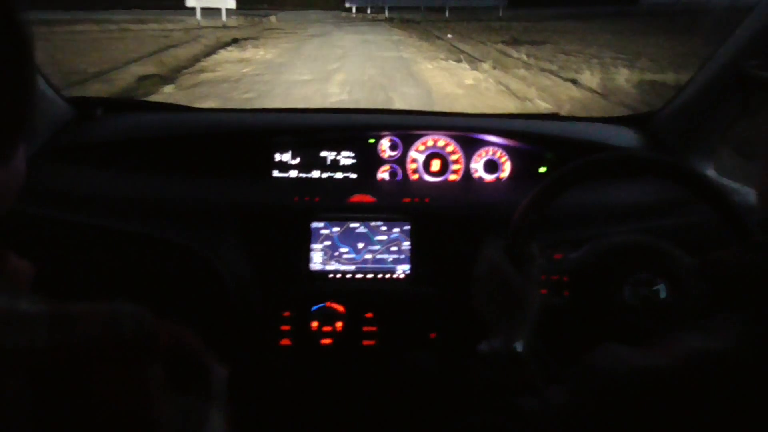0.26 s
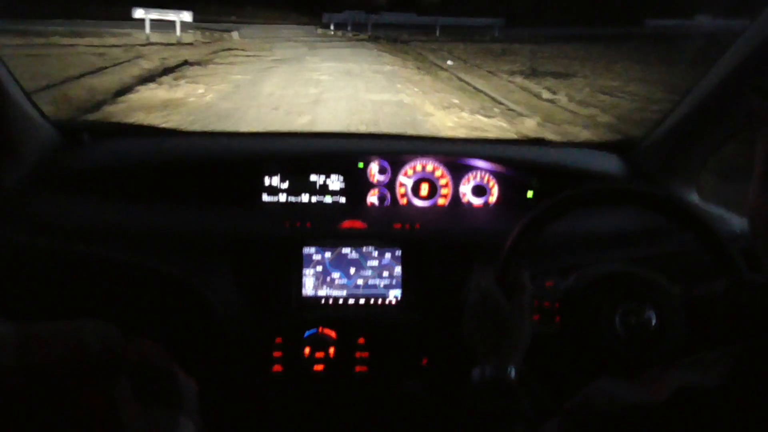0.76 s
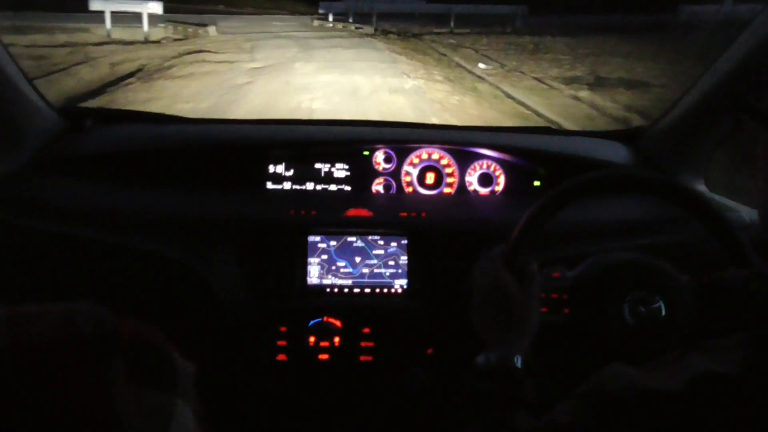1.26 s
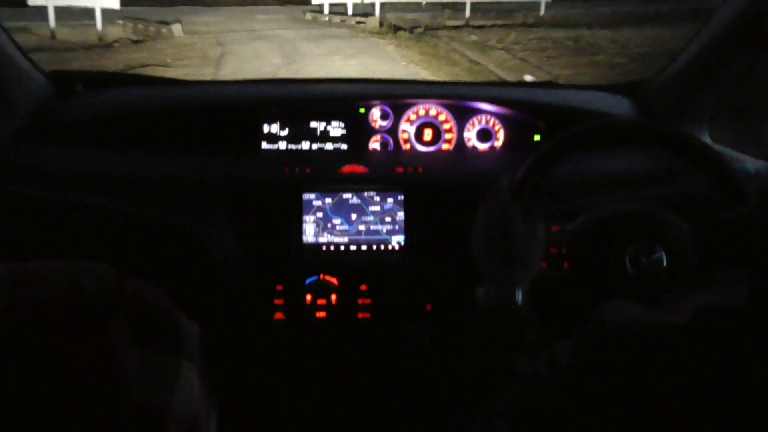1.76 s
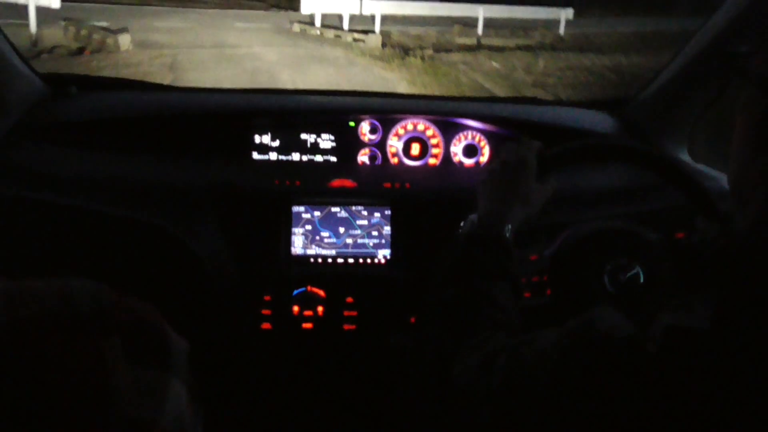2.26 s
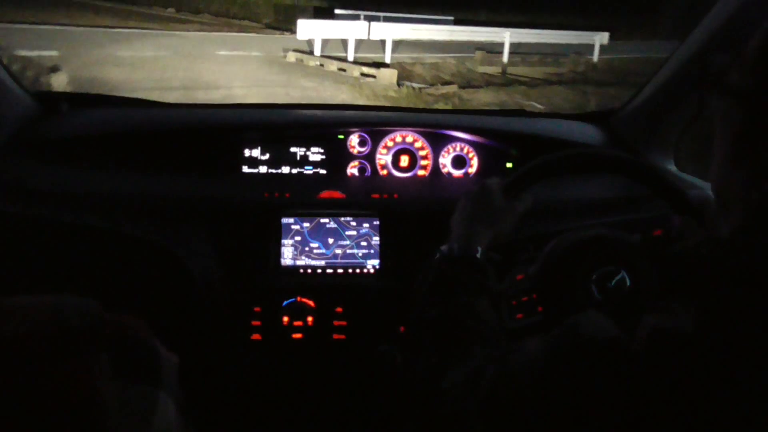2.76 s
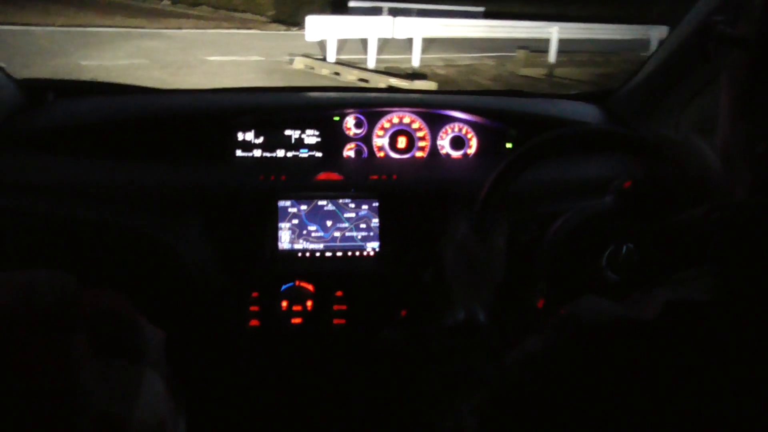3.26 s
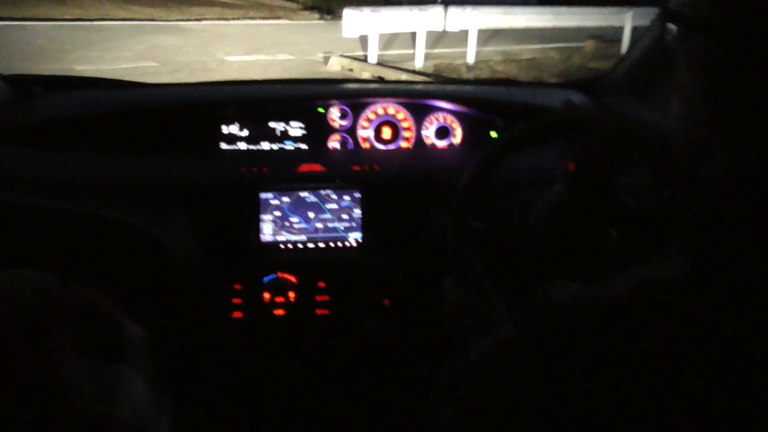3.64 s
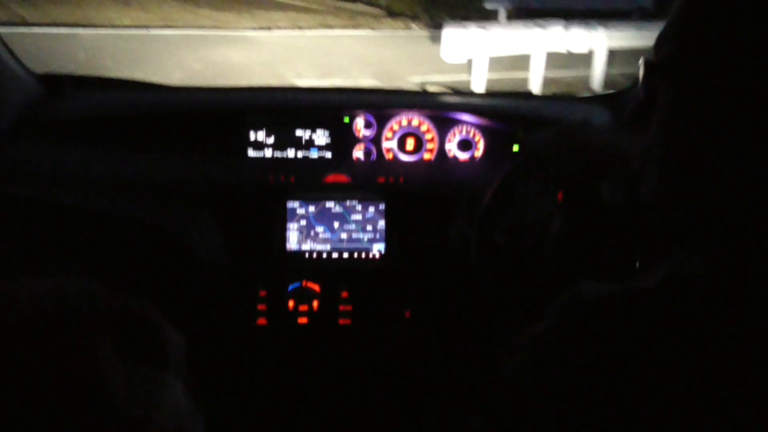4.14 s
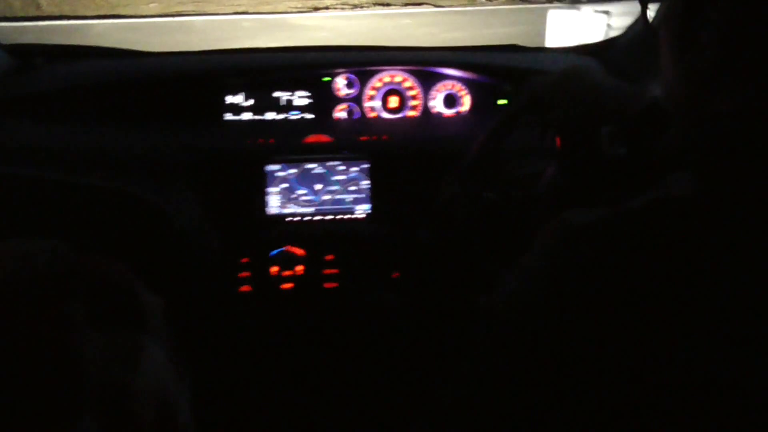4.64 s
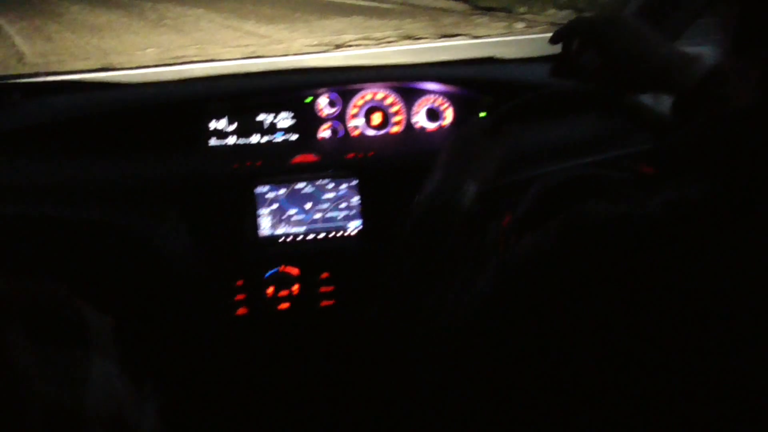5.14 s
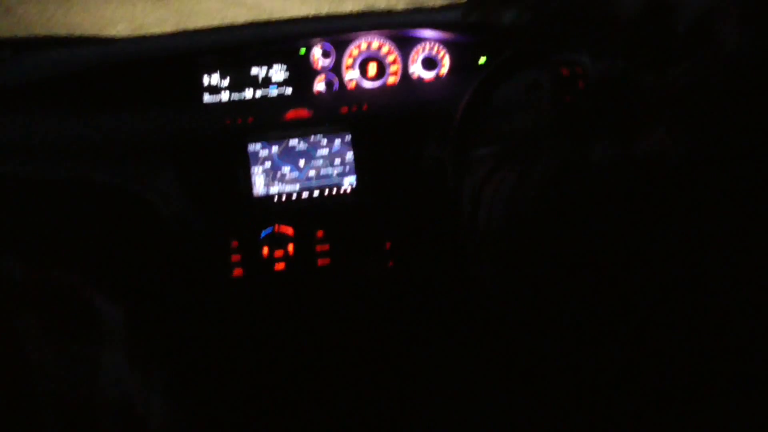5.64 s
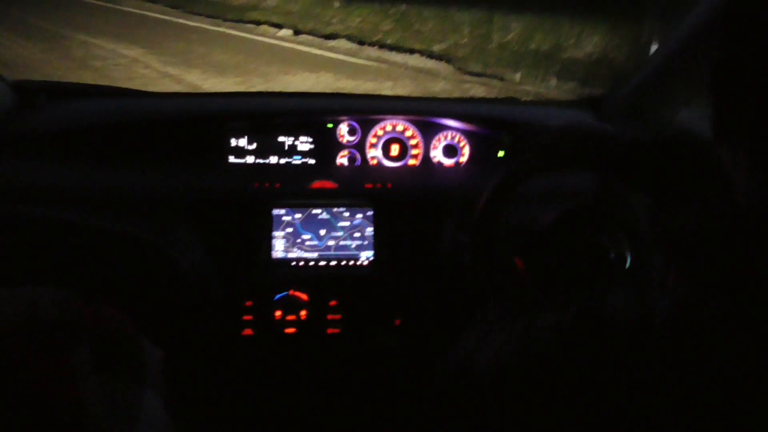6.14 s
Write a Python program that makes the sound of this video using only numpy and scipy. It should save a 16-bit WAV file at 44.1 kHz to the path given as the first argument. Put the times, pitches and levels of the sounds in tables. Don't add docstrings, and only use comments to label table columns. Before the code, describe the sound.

A close, muffled cabin microphone picks up boomy low road noise, fluttering with every ridge, while small stones tick underneath and plastic panels chatter. The car slows and the roar thins out to a low wash. Dry rustling of palms on the wheel comes forward, with sharp trim ticks and suspension clunks. The heaviest blow comes late, a dull double thump, then light knocks to the end.

```python
import sys
import numpy as np
from scipy import signal
from scipy.fft import rfft, irfft, next_fast_len
from scipy.io import wavfile
from scipy.ndimage import uniform_filter1d, map_coordinates

SR = 44100
rng = np.random.default_rng(int(sys.argv[2]) if len(sys.argv) > 2 else 0)


def pcm_store(signal):
    levels = np.round(np.clip(np.atleast_2d(signal), -1, 1) * 32767)
    wavfile.write(sys.argv[1], SR, levels.astype(np.int16).T)


def convert_level_to_amplitude(level_db):
    exponent = np.asarray(level_db, float) / 20
    return 10 ** exponent


N = 282240


def unit(x):
    return x / np.sqrt(np.mean(x ** 2) + 1e-20)


def along(points, hz):
    f, v = np.transpose(points)
    return np.interp(np.log(hz + 1), np.log(f + 1), v)


def curves(rows):
    s, *cols = np.transpose(rows)
    return [np.interp(np.arange(N) / SR, s, c) for c in cols]


def swings(rows, half_s):
    s, db = np.transpose(rows)
    t = np.arange(0, N + 64, 64) / SR
    lift = db * np.exp(-((t[:, None] - s) / half_s) ** 2)
    return np.interp(np.arange(N) / SR, t, lift.max(axis=1) + lift.min(axis=1))


def wobble(rate):
    knots = rng.standard_normal(int(N * rate / SR) + 4)
    return map_coordinates(knots, [np.arange(N) * rate / SR])


def filtered(x, response):
    m = next_fast_len(N + SR // 2)
    return irfft(rfft(x, m) * response(np.fft.rfftfreq(m, 1 / SR)), m)[..., :N]


def resonant(modes):
    def response(f):
        total = 0
        for k, (centre, width, db) in enumerate(modes):
            damping = 1j * f * width
            total = total + (-1) ** k * convert_level_to_amplitude(db) * damping / (centre * centre - f * f + damping)
        return total
    return response


def shaped(points):
    return lambda f: convert_level_to_amplitude(along(points, f))


def below(hz):
    return lambda f: 1 / (1 + 1j * f / hz) ** 4


def rush(response, lumps_db=0, even=0):
    x = unit(filtered(convert_level_to_amplitude(lumps_db) * rng.standard_normal((2, N)), response))
    power = uniform_filter1d(uniform_filter1d(x ** 2, SR // 12), SR // 12)
    return unit(x / np.abs(power + 1e-3) ** (even / 2))


def bursts(times, gains, t60, rise):
    t = np.arange(SR // 10) / SR
    shape = convert_level_to_amplitude(-60 * t / t60) * (1 - np.exp(-t / rise))
    out = np.zeros((2, N + len(t)))
    for s, g, noise in zip(times, gains, rng.standard_normal((len(times), 2, len(t)))):
        start = round(s * SR)
        burst = shape * noise
        out[:, start:start + len(t)] += g * burst / np.linalg.norm(burst, axis=1, keepdims=True)
    return out[:, :N]


def pushes(times, gains, length):
    out = np.zeros((2, N))
    out[0, np.round(times * SR).astype(int)] = gains
    push = np.sin(np.pi * np.arange(0, 1, 1 / (length * SR)))
    return signal.fftconvolve(out, push[None], axes=1)[:, :N]


# f/Hz, correlation/1
LIKENESS = [(30, 1), (80, 0.98), (170, 0.91), (350, 0.92), (700, 0.74), (1400, 0.52), (3000, 0.47),
            (5000, 0.4), (9000, 0.23), (14000, 0.26)]


def stereo(pair):
    def turn(hz):
        angle = np.arccos(np.clip(along(LIKENESS, hz), -1, 1)) / 2
        return np.array([np.cos(angle), np.sin(angle)])
    mid, side = filtered(pair, turn)
    return np.array([mid + side, mid - side])


def sides(times, lean_db):
    return convert_level_to_amplitude(np.interp(np.arange(N) / SR, times + .005, lean_db) / 2 * [[1], [-1]])


# f/Hz, level/dB per Hz
HISS = [(1060, -36.5), (1800, -0.5), (2010, -11), (5810, -11.5), (7340, -11), (11300, -4.5), (15500, -8)]


def microphone_hiss():
    return convert_level_to_amplitude(-70.5) * stereo(rush(shaped(HISS)))


# f/Hz, level/dB per Hz
DRONE = [(200, -26.5), (400, 1.5), (700, -7.5), (1200, -13.5), (1550, -16.5), (1900, -32), (3000, -51.5)]


def engine_bay():
    return convert_level_to_amplitude(-56.0 + wobble(4.5)) * rush(shaped(DRONE))


# t/s, rolling energy level/dB
SPEED = [
    (0, -0.5),
    (2.0, 0.5),
    (3.4, -6.5),
    (5.0, -9.5),
    (6.4, -17),
]
# f/Hz, width/Hz, level/dB
SHELL = [(25.6, 20, -25.5), (38.3, 10, -12), (79.94, 6.9, 2.5)]
# f/Hz, level/dB
SHAKE_DIP = [(25, 0), (40, -1.5), (52, -5), (66, 0)]
# t/s, lift level/dB
HEAVES = [(.21, 2.5), (.66, 6.5), (.89, 1.5), (1.05, 3), (1.4, 2.5), (1.55, 1.5), (1.7, 6.5), (1.9, 4),
          (2.04, 0), (2.33, 8), (2.5, 7), (2.91, 5.5), (3.47, 2), (3.66, 7), (3.92, 7.5), (4.08, 7),
          (4.51, 6), (4.87, 2.5), (5.6, 6), (6.0, 7), (6.22, 9.5)]


def shell_shake(speed_db):
    shake = rush(lambda f: resonant(SHELL)(f) * below(200)(f) * shaped(SHAKE_DIP)(f) * f / (f + 15), even=0.91)
    return convert_level_to_amplitude(-28.5 + 1.04 * speed_db + swings(HEAVES, half_s=0.062)) * shake


# f/Hz, width/Hz, level/dB
CABIN = [(107.2, 10.5, -1.5), (132.2, 11.94, 2.5), (149.9, 22.2, -5.5)]
# t/s, lift level/dB
PUMPS = [(.1, 3), (.32, 4.5), (.48, 8.5), (.66, 8.5), (.75, 4.5), (.89, 2), (1.05, 9.5), (1.25, 2.5),
         (1.34, 6.5), (1.6, 3.5), (1.83, 6.5), (1.99, 5), (2.3, 6), (2.46, 7.5), (2.71, 6.5), (2.95, -2),
         (3.33, 7.5), (3.65, -1), (3.99, 3.5), (4.15, -1), (4.31, 3.5), (4.42, 3), (4.63, 7), (5.17, 8),
         (5.33, 9.5), (5.6, 6.5), (5.72, 7), (5.78, 9), (6.15, 10.5), (6.39, 3)]


def cabin_boom(speed_db):
    boom = rush(lambda f: resonant(CABIN)(f) * below(500)(f) * f / 130, even=0.52)
    return convert_level_to_amplitude(-27.5 + 0.96 * speed_db + swings(PUMPS, half_s=0.044)) * boom


# f/Hz, width/Hz, level/dB
TYRE = [(201, 19.7, -1.5), (226.9, 11.1, 0.5)]
# t/s, lift level/dB
RIDGES = [(.06, 6), (.36, 4), (.68, 9.5), (.93, 11.5), (1.5, 6), (2.91, 8.5), (3.62, 6.5), (4.42, 10),
          (4.81, 8.5), (5.03, 5.5), (5.74, 13.5), (.15, 7), (.22, -3.5), (.5, 1.5), (.59, 7.5), (.8, 0.5),
          (1.05, 4), (1.2, 3.5), (1.36, -4), (1.62, 0.5), (1.75, 2.5), (1.9, 3.5), (2.05, 3.5), (2.2, -2),
          (2.35, 3.5), (2.5, 0.5), (2.7, 1), (3.1, 9), (3.3, 4.5), (3.45, 4.5), (3.85, 0), (4.1, 1.5),
          (5.25, -12), (5.45, -21), (6.05, 4)]


def tyre_hum(speed_db, stones):
    hum = rush(lambda f: resonant(TYRE)(f) ** 2, lumps_db=1.5 * stones, even=0.78)
    return convert_level_to_amplitude(-34.5 + 1.14 * speed_db + swings(RIDGES, half_s=0.069)) * hum


# f/Hz, level/dB per Hz
ROAR = [(100, -20.5), (170, 8.5), (219, 1), (253, -3.5), (295, -6.5), (370, -14.5), (439, -14.5),
        (505, -22), (590, -19), (652, -23), (1130, -34.5), (1760, -51.5), (2050, -51.5), (5000, -65.5),
        (6500, -94.5), (11000, -120)]
# t/s, lift level/dB
PATCHES = [(.2, 2.5), (.5, -2.5), (.71, 5), (.89, -1), (1.34, 0.5), (1.99, 1.5), (2.5, 1.5), (2.97, -2.5),
           (3.2, 3), (3.33, -2), (3.55, -6), (4.23, 6.5), (4.85, -4), (5.33, 5), (5.4, -1), (6.24, -1)]


def tread_roar(rough_db, stones):
    def floor(f):
        high_pass = (f / 240) ** 4 / (1 + (f / 240) ** 4)
        lift = convert_level_to_amplitude(5 / (1 + (f / 1580) ** 16))
        return shaped(ROAR)(f) * high_pass * lift
    roar = rush(floor, lumps_db=1.3 * stones + 1.1 * wobble(45))
    return convert_level_to_amplitude(rough_db + 4 + swings(PATCHES, half_s=0.04)) * roar


# t/s, level/dB
ROAD = [(0.0, -31.5), (0.46, -34.5), (0.8, -32.5), (1.23, -34), (1.57, -32), (1.8, -33.5), (2.41, -40),
        (2.73, -37.5), (2.97, -41.5), (3.24, -45), (3.6, -44.5), (4.15, -49), (4.45, -41.5), (4.62, -42.5),
        (5.24, -48.5), (5.72, -45), (6.01, -48), (6.4, -50)]


def road():
    rough_db, speed_db = curves(ROAD)[0], curves(SPEED)[0]
    lift_db = 0.22 * (rough_db - rough_db.mean())
    stones = wobble(14)
    low = shell_shake(speed_db) + cabin_boom(speed_db) + tyre_hum(speed_db, stones)
    return convert_level_to_amplitude(lift_db) * low + tread_roar(rough_db, stones)


# t/s, lift level/dB
DRUMS = [(.06, -1), (.3, 5), (.45, 10.5), (.62, 12.5), (.95, 2), (1.06, 15.5), (1.55, 15), (1.7, 8),
         (1.87, 9), (2.1, 7), (2.22, 6.5), (2.4, 12), (2.52, 10.5), (2.7, 5), (2.9, 12), (3.25, 11),
         (3.6, 12.5), (3.9, 8.5), (4.15, 4), (4.45, 3), (4.8, 12), (5.1, 10), (5.27, 16), (5.55, 11),
         (5.69, 6), (5.88, 6), (6.22, 8), (6.34, 5)]


def floor_pan():
    hum = rush(lambda f: resonant([(296.2, 50, 0)])(f) ** 2, even=0.8)
    return convert_level_to_amplitude(-44.5 + 1.2 * curves(SPEED)[0] + swings(DRUMS, half_s=0.031)) * hum


# f/Hz, width/Hz, level/dB
TRIM = [(2085, 400, 3), (3090, 1100, 3.5), (4060, 3100, 1), (5230, 2200, -14)]


def grit(count=260):
    when, size = rng.random((count, 2)).T
    s = when * (N / SR - .01)
    db = curves(ROAD)[0][(s * SR).astype(int)] - 4.2 * np.log(size + 1e-3) - 13
    hits = bursts(s, convert_level_to_amplitude(db), t60=.025, rise=.0007)
    return filtered(hits, lambda f: resonant(TRIM)(f) * below(9000)(f))


# f/Hz, level/dB per Hz
RUSTLE = [(2940, -41.5), (5000, -22), (6300, -6), (7340, -0.5), (10300, -4), (12000, -2.5), (13200, -7),
          (15500, -22)]
# f/Hz, level/dB per Hz
SCUFF = [(1500, -14.5), (2100, -2), (2600, -6.5), (3900, -5), (5500, -9.5), (7000, -26.5)]
# start t/s, length t/s, level/dB, rise t/s
STROKES = [(0, 0.041, -67.5, .05), (0.148, 0.36, -73, 0.052), (0.624, 0.14, -66.5, .04),
           (1.03, .35, -69.5, 0.044), (1.48, 0.049, -67.5, .03), (1.602, 0.37, -71, .05),
           (1.955, 0.32, -69.5, 0.057), (3.215, .38, -65, 0.21), (3.95, 0.45, -64.5, 0.11),
           (4.718, 0.11, -55, 0.073), (3.11, .1, -72.5, 0.09), (4.913, 0.12, -62.5, 0.046),
           (5.135, 0.079, -67.5, .05), (5.27, 0.61, -64.5, .08), (4.505, 0.21, -71.5, .05),
           (4.797, 0.063, -59.5, .04), (5.85, .05, -64, 0.03), (6.003, 0.3, -63.5, .05),
           (6.116, 0.023, -61, .02), (6.288, 0.072, -63, 0.086), (6.394, .1, -54.5, 0.071),
           (3.238, .06, -71, .03), (3.64, .22, -67.5, .05), (3.97, .16, -66, .06)]


def slide():
    t = np.arange(N) / SR
    rest_db, let_go_s, slackens_db_per_s = -72, 0.099, 1
    power = 0
    for s, length, db, rise in STROKES:
        grip = np.clip((t - s) / rise + 1, 0, 1)
        release = np.exp(-np.maximum(t - s - length, 0) / let_go_s)
        power = power + convert_level_to_amplitude(2 * (db - slackens_db_per_s * (t - s))) * (grip * release) ** 2
    over_db = 10 * np.log10(1 + power / convert_level_to_amplitude(2 * rest_db))
    grain = rush(shaped(RUSTLE))
    fine = convert_level_to_amplitude(over_db) * grain
    weight = filtered(grain, lambda f: resonant([(7900, 2500, 0)])(f) ** 2)
    heavy = convert_level_to_amplitude(-22.5 + 1.5 * over_db) * weight
    coarse = convert_level_to_amplitude(-4.5 + 0.64 * over_db) * rush(shaped(SCUFF))
    return convert_level_to_amplitude(rest_db + 1.5 + 0.66 * wobble(35)) * (fine + heavy + coarse)


# t/s, f/Hz, level/dB
PINGS = [(.005, 1170, -37), (1.078, 3220, -59), (4.686, 1800, -62), (4.944, 1000, -52), (5.859, 1590, -57),
         (5.246, 416, -43), (4.496, 1680, -53), (.146, 900, -53), (.874, 805, -50), (.911, 776, -41),
         (1.169, 2050, -58), (2.461, 800, -56.5), (6.134, 2000, -64), (6.146, 2200, -57), (1.56, 810, -34),
         (4.63, 1190, -46), (4.783, 2130, -60), (5.535, 2700, -64), (1.483, 2200, -59), (1.518, 935, -40),
         (1.521, 2120, -52), (1.533, 2510, -55), (1.566, 2090, -54), (1.567, 4140, -58), (1.604, 940, -50),
         (1.638, 1050, -48), (1.638, 2080, -49), (1.643, 4580, -49), (2.235, 4530, -58), (2.474, 3580, -65),
         (4.607, 1480, -59), (4.63, 2170, -62), (4.715, 800, -48), (4.76, 2080, -60), (4.762, 1090, -55),
         (4.855, 2200, -62), (5.014, 1990, -64), (5.246, 1190, -46), (5.513, 940, -55), (5.513, 2200, -58),
         (5.524, 440, -42), (5.646, 770, -31.5), (5.647, 1080, -45), (5.647, 1364, -43), (5.646, 2210, -54),
         (5.65, 565, -42), (4.763, 530, -42), (4.762, 750, -39.5), (4.795, 744, -48), (4.803, 1150, -55),
         (4.63, 866, -50), (4.638, 605, -47), (4.948, 910, -53), (4.963, 1150, -51), (4.975, 700, -53),
         (1.573, 1100, -44), (1.574, 3500, -60), (5.512, 1235, -46), (5.52, 600, -42)]


def pings():
    out, t = np.zeros((2, N + SR)), np.arange(SR // 6) / SR
    t60_s = 0.032
    for s, hz, db in PINGS:
        decay_db = 60 * t / t60_s * (hz / 1000) ** 0.59
        tone = (1 - np.exp(-t / 0.0018)) * np.sin(2 * np.pi * hz * t)
        out[0, round(s * SR):][:len(t)] += convert_level_to_amplitude(db + 10.0 - decay_db) * tone
    return out[:, :N]


# t/s, peak level/dB, left-right level/dB
SNAPS = [(0.3691, -48.5, 0.5), (0.6274, -56, -5), (0.8, -54.5, 0.5), (1.029, -49, -2), (1.4795, -43, -4),
         (1.5207, -48, -2), (1.6445, -40.5, 6), (1.9613, -48, -2), (2.2357, -45, -0.5),
         (2.5574, -58.5, -5.5), (4.1084, -51.5, 0.5), (4.714, -49.5, -2.5), (4.8554, -42, 1),
         (5.0064, -45.5, -1.5), (5.5123, -56, 1.5), (5.648, -45.5, -6), (5.8486, -48.5, -2), (5.9, -46, -2),
         (6.0294, -44, -1), (6.122, -36.5, -1), (6.139, -46.5, -3.5), (5.536, -47, -1), (3.226, -56.5, 3),
         (4.005, -49, 1.5), (4.39, -50, 3), (5.875, -52, 2), (.003, -44, -2), (.195, -54, 2),
         (1.104, -51, 1), (1.151, -55, -2), (1.235, -52, 0), (1.393, -51.5, 0), (4.499, -56, 0),
         (4.61, -55, 0)]


def snaps():
    s, db, side_db = np.transpose(sorted(SNAPS))

    def joint(f):
        return resonant([(5000, 3000, -3), (8500, 6000, 0)])(f) * f / (f + 3000) * below(30000)(f)
    crack = filtered(bursts(s - .001, convert_level_to_amplitude(db + 21.0), t60=.025, rise=.0005), joint)
    return sides(s, side_db) * stereo(crack)


# f/Hz, width/Hz, level/dB
PANEL = [(825, 190, 6.5), (1120, 306, 11.5), (1580, 280, -8)]
# t/s, peak level/dB, panel level/dB
RATTLES = [(0.106, -51.5, 21.5), (0.368, -62, 4), (0.403, -52, 16), (0.457, -51.5, 20), (0.587, -52.5, 19),
           (0.6525, -50.5, 20.5), (0.7141, -50, 16), (0.767, -57.5, 10), (0.8015, -51, -1),
           (1.027, -54.5, 12), (1.0826, -55, 14), (1.171, -45.5, 20), (1.206, -55, 22), (1.228, -51, 23.5),
           (1.257, -49, 21), (1.343, -48.5, 0), (1.4834, -50.5, 12), (1.5218, -47, 19.5),
           (1.5655, -42, 19.5), (1.6403, -47, 20.5), (1.749, -52.5, 21.5), (1.8352, -51.5, 19),
           (1.8875, -47.5, 14), (1.961, -50.5, 12), (2.0718, -52, 14), (2.2362, -62.5, 3), (2.473, -50, 2),
           (2.5578, -55, 3), (2.661, -60, 9), (2.747, -52.5, 5), (0.29, -59.5, 22), (1.495, -54, 8),
           (1.511, -52, 10), (1.534, -48.5, 7), (1.551, -55.5, 8), (2.1248, -58, 8), (2.277, -61.5, 5),
           (2.345, -62, 3), (2.445, -61, 2), (.004, -46, 6), (1.036, -50, 10), (1.058, -50, 16),
           (1.277, -51.5, 8), (1.576, -50, 15)]
# t/s, peak level/dB, panel level/dB
TICKS = [(3.311, -54, 10), (4.1075, -51, 6), (4.224, -56.5, -5), (4.2694, -50, -4), (4.4483, -51, 11),
         (4.4957, -52, -2), (4.5203, -50.5, 5), (4.605, -57, 2), (4.6298, -52.5, 16), (4.6845, -59, 1),
         (4.714, -54.5, 14), (4.761, -45.5, 9), (4.785, -48, 11), (4.8565, -55.5, -11), (4.937, -57.5, 21),
         (4.956, -62, 23), (5.007, -53, 11), (5.0846, -58.5, 23), (5.245, -45.5, 15.5), (5.3502, -53, 7),
         (5.425, -52, 2), (5.5138, -39.5, 13), (5.646, -36.5, 14.5), (5.757, -53, 3), (5.858, -50.5, 16.5),
         (6.0124, -52.5, 6), (6.1226, -50.5, 5.5), (6.322, -50, 17), (5.447, -49.5, 6), (5.535, -48, -1)]


def rattles():
    s, db, panel_db = np.transpose(sorted(RATTLES) + sorted(TICKS))
    usual_db = -53
    edge_db = np.repeat([-9, -7], [len(RATTLES), len(TICKS)]) + usual_db + 0.5 * (db - usual_db)
    panel = filtered(bursts(s - .002, convert_level_to_amplitude(db + panel_db + 24.5), t60=0.035, rise=0.00019),
                     lambda f: resonant(PANEL)(f) * below(2600)(f) ** 2)
    dull = filtered(bursts(s - .002, convert_level_to_amplitude(db + 26.0), t60=0.052, rise=0.0011),
                    lambda f: resonant(TRIM)(f) * below(12000)(f))
    edge = filtered(bursts(s - .001, convert_level_to_amplitude(edge_db + 23), t60=.03, rise=.001),
                    lambda f: resonant([(8500, 6000, 0)])(f) ** 2)
    scatter_db = -3 * rng.standard_normal(len(s))
    return sides(s, scatter_db) * stereo(panel + dull + edge)


def chatter(count=3):
    s, db, _ = np.transpose(RATTLES)
    late, size = rng.random((len(s), count, 2)).T
    s = np.minimum(s + 0.02 * (.3 + 2 * late), N / SR - .01)
    db = db - 7 - 8 * size
    contacts = bursts(s.ravel(), convert_level_to_amplitude(db.ravel() + 28.0), t60=0.015, rise=0.0015)
    return filtered(contacts, lambda f: (resonant(TRIM)(f) + convert_level_to_amplitude(6.0) * resonant(PANEL)(f)) * below(6000)(f))


# t/s, f/Hz, peak level/dB, decay T60/s
THUDS = [(5.5205, 121, -14, 0.27), (5.5225, 173, -12.5, .07), (5.6465, 305, -17, 0.081),
         (5.6565, 303, -15, 0.045), (4.783, 830, -32.5, 0.057), (5.666, 126, -20.5, 0.51),
         (5.085, 310, -29, 0.059), (5.254, 600, -41, .05), (5.246, 1500, -46, .04), (6.3, 470, -38, .07),
         (5.866, 440, -35, .07), (5.938, 320, -30, 0.093), (6.216, 883, -38, 0.047),
         (6.222, 600, -41, 0.055), (6.338, 299, -30, .08), (5.466, 1400, -51, .05), (5.205, 700, -44, .07),
         (6.39, 1250, -46, .05)]


def thuds():
    out, t = np.zeros((2, N + SR)), np.arange(SR // 2) / SR
    for s, hz, db, t60 in THUDS:
        build = 1 - np.exp(-t * hz / 0.88)
        out[0, round(s * SR):][:len(t)] += convert_level_to_amplitude(db - 60 * t / t60) * build * np.sin(2 * np.pi * hz * t)
    return out[:, :N]


def shudder():
    s, db = np.transpose(KNOCKS)[:2]
    t = np.arange(N) / SR
    power = 0
    for start, level in zip(s, db):
        power = power + convert_level_to_amplitude(2 * level) * (t > start + .01) * np.exp(-2 * np.abs(t - start) / 0.14)
    return convert_level_to_amplitude(-24) * np.sqrt(power) * rush(lambda f: shaped(ROAR)(f) * (f / 300))


# f/Hz, width/Hz, level/dB
STRUT = [(423, 69, 7), (591.5, 31, 9.5), (760, 260, 1.5), (1023, 130, -2), (1195, 220, -2)]
# t/s, peak level/dB, floor pan level/dB, thump level/dB
KNOCKS = [(0.145, -45, -9, 3), (0.248, -42, -10, -3), (0.279, -42, -3, 10.5), (0.76, -40, -1, 6.5),
          (0.874, -26, -3, 3), (0.912, -39.5, 16.5, 0.5), (1.078, -29, -5.5, 7), (1.168, -40.5, -11, 10.5),
          (1.639, -40, -8, 3.5), (2.462, -38.5, -14, 6), (4.139, -31, -21, 17.5), (4.502, -33.5, -20, -11),
          (4.629, -26.5, -10.5, -9), (4.762, -30.5, -19, 3), (4.787, -30, -22, 18.5), (4.946, -36, -8, -1),
          (5.08, -28.5, -8.5, 2), (5.248, -23.5, -11, 10), (5.516, -25, -12, 10), (5.522, -20, -13, -17),
          (5.646, -19.5, -28, -5), (5.862, -28.5, -7.5, 1), (5.939, -31, -15, 4), (6.216, -30.5, -4.5, -9),
          (6.321, -43, -17, -7), (6.336, -27, -4.5, -8)]


def knocks():
    s, db, pan_db, thump_db = np.transpose(KNOCKS)
    strut = filtered(bursts(s - .004, convert_level_to_amplitude(db + 31.0), t60=0.083, rise=0.0025),
                     lambda f: resonant(STRUT)(f) * below(2200)(f) ** 2)
    floor = filtered(pushes(s + 0.0008, convert_level_to_amplitude(db + pan_db + 22.5), length=0.0015),
                     lambda f: resonant([(303, 45, 0)])(f) ** 2)
    air = filtered(pushes(s + 0.00864, convert_level_to_amplitude(db + thump_db + 2.0), length=0.0028),
                   resonant([(127.8, 2.3, 3.5), (147, 29.0, 0.0043)]))
    return strut + floor + air


def scene():
    rolling = engine_bay() + road() + floor_pan() + grit()
    handling = slide() + pings() + chatter()
    blows = thuds() + shudder() + knocks()
    return stereo(rolling + handling + blows) + rattles() + snaps()


# f/Hz, left-right level/dB
LEAN = [(60, 2), (110, -0.5), (200, -0.5), (380, -1.0), (700, -2.0), (1290, -1.0), (2380, -0.5),
        (4400, -0.5), (8120, 0), (15000, -3.5)]


def microphone_ports(heard):
    return filtered(heard, lambda hz: convert_level_to_amplitude(along(LEAN, hz) / 2 * [[1], [-1]]) * (hz < 15800))


def band_limit(x):
    return signal.sosfilt(signal.butter(12, 15700, fs=SR, output="sos"), x)


def record(dry):
    mix = microphone_ports(dry + microphone_hiss())
    return band_limit(mix)


dry = scene()
out = record(dry)
pcm_store(out)
```